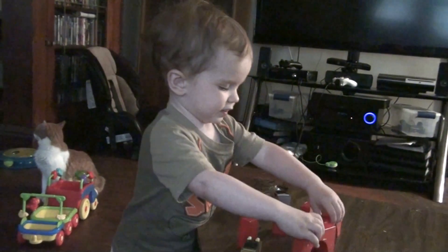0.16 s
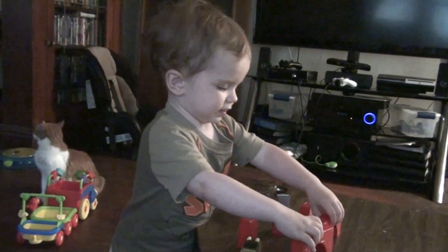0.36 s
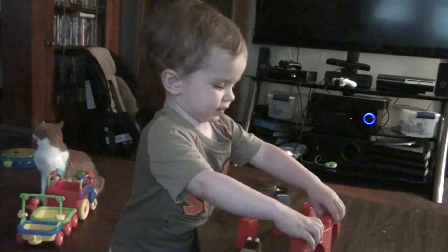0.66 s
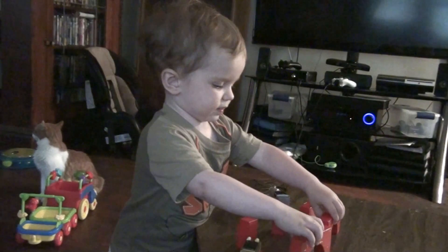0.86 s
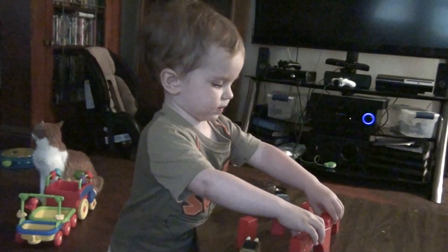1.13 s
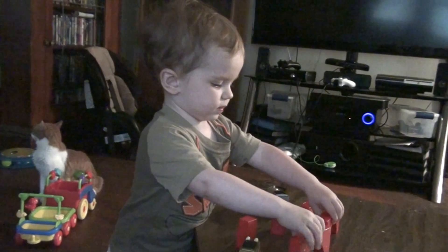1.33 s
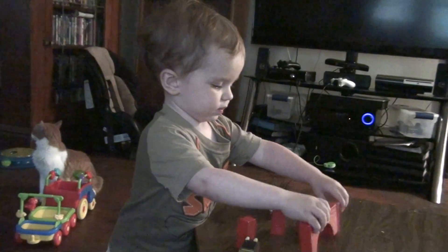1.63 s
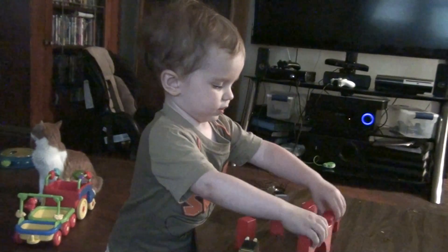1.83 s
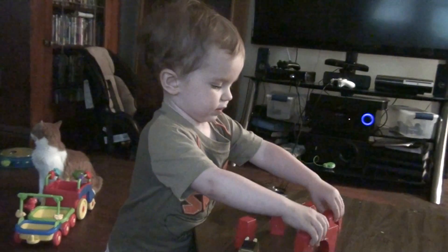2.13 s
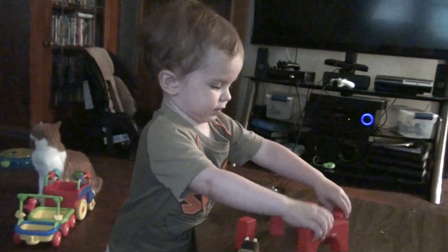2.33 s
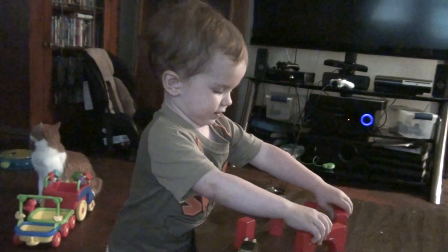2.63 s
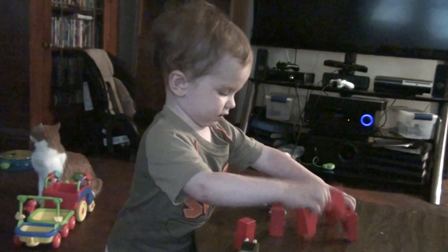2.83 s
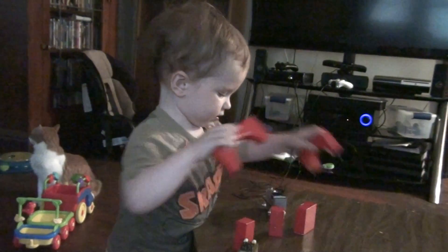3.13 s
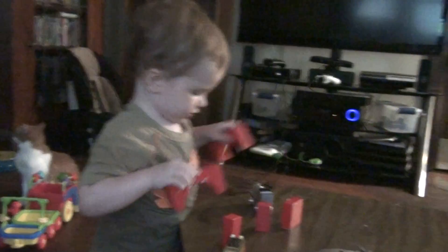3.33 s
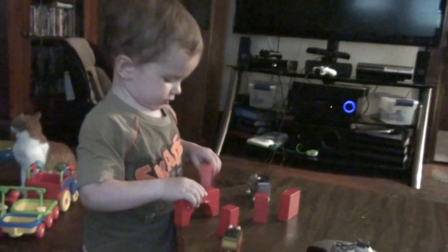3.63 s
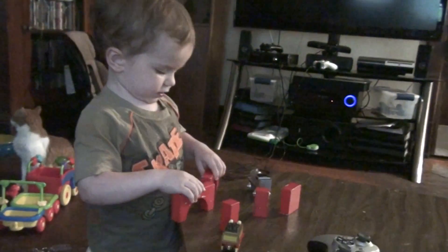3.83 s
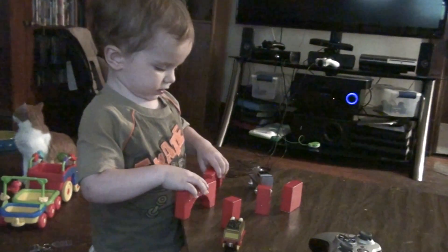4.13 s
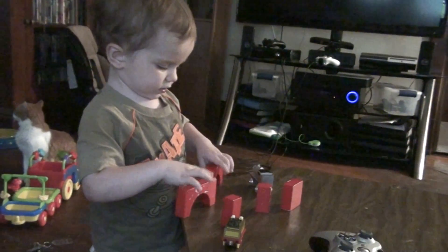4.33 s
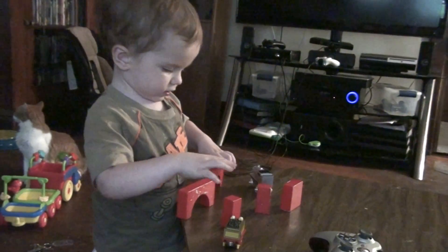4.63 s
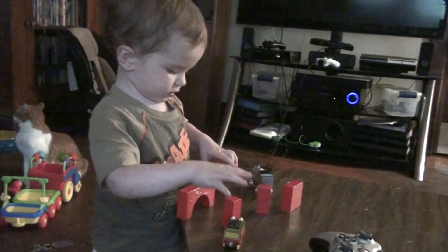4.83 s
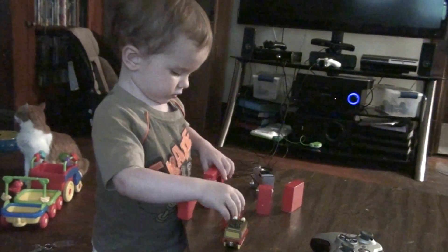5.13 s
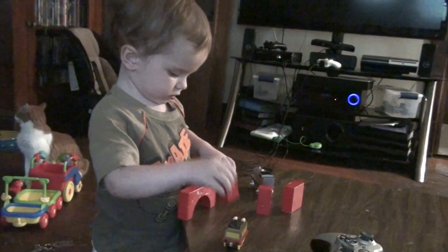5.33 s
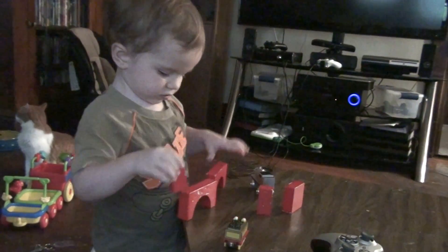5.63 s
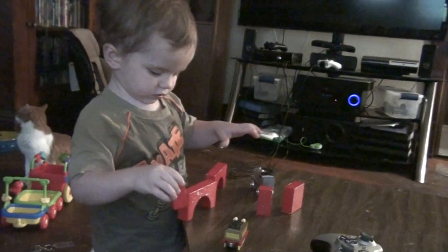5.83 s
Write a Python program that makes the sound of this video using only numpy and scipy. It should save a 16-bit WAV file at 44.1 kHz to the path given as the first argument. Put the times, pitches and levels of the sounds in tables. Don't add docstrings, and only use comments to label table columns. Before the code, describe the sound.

Wooden blocks are bumped, pushed together and set down on a tabletop indoors. Bright, dry clacks with occasional clear pings and woody thumps come in separate clusters: at the start, near two seconds, and after three and a half. The rest is nearly still, with tiny taps over fading rumble, distant street wash and microphone hiss. Stereo, close, slightly right of centre.

```python
import sys
import numpy as np
from scipy import signal
from scipy.io import wavfile
from scipy.ndimage import uniform_filter1d, map_coordinates

SR = 44100
rng = np.random.default_rng(int(sys.argv[2]) if len(sys.argv) > 2 else 0)


def invert_db(level):
    return 10 ** (np.asarray(level, dtype=float) / 20)


def store_pcm(level_fs):
    pcm = np.round(np.clip(level_fs, -1, 1) * 32767).astype(np.int16)
    wavfile.write(sys.argv[1], SR, np.atleast_2d(pcm).T)


N = 263277


def unit(x):
    return x / np.sqrt(np.mean(x ** 2) + 1e-20)


def along(points, hz):
    point_hz, value = np.transpose(points)
    return np.interp(np.log(hz + 1), np.log(point_hz + 1), value)


def wobble(rate_hz):
    knots = rng.standard_normal(int(N * rate_hz / SR) + 4)
    return map_coordinates(knots, [np.arange(N) * rate_hz / SR])


def stereo(z, hz, alike, lean):
    turn = np.arccos(np.clip(along(alike, hz), -1, 1))[:, None] / 2
    mid, side = z[0] * np.cos(turn), z[1] * np.sin(turn)
    lean_db = np.multiply.outer([.5, -.5], along(lean, hz))
    return np.array([mid + side, mid - side]) * invert_db(lean_db)[:, :, None]


# f/Hz, left-right likeness
FLOOR_ALIKE = [(60, 1), (150, 0.96), (380, 0.24), (950, -0.1), (2380, 0.11), (5980, 0.52), (15000, 1)]
# f/Hz, left minus right/dB
FLOOR_SIDE = [(60, -1.0), (240, -1.5), (950, 0), (3770, -0.5), (15000, 0.5)]


def rush(spectrum, patchy_db):
    hz, _, z = signal.stft(rng.standard_normal((2, N + 4096)), SR, nperseg=4096)
    patches = unit(uniform_filter1d(rng.standard_normal(z.shape[1:]), size=24, axis=0))
    gain_db = along(spectrum, hz)[:, None] + patchy_db * patches
    z = stereo(z, hz, FLOOR_ALIKE, FLOOR_SIDE) * invert_db(gain_db)
    return unit(signal.istft(z, SR, nperseg=4096)[1][:, :N])


# t/s, level over calm/dB
BACKGROUND = [
    (0, 8.5),
    (.6, 10),
    (.85, 5.5),
    (1.3, 3),
    (1.75, 3.5),
    (2.7, 6.5),
    (2.82, 7),
    (2.95, 2),
    (4.1, 1.5),
    (5.97, -0.94),
]
# f/Hz, level per Hz/dB
RUMBLE = [(21, -51.5), (35, -6.5), (48, -15.5), (81, -1.5), (129, -10), (144, -21), (177, -11),
          (208, -21.5), (235, -9), (269, -17), (301, -21), (400, -18.5), (520, -49), (880, -120)]
# f/Hz, level per Hz/dB
STREET = [(200, -39), (280, -10.5), (450, -7), (950, -6.5), (1500, -12.5), (3000, -17.5), (5000, -25.5),
          (9000, -66)]
# f/Hz, level per Hz/dB
HISS = [(1470, -37), (2500, -9), (2660, -7), (4240, -4.5), (4760, -5), (5150, -3.5), (15200, -7.5),
        (16000, -6.5)]


def house():
    t = np.arange(N) / SR
    swell_db = np.interp(t, *np.transpose(BACKGROUND))
    fade_db_per_s = 0.07
    rumble_db = -53 + 0.66 * swell_db - fade_db_per_s * (t - t.mean()) + 0.65 * wobble(8.2)
    street_db = -59 + swell_db + 0.25 * wobble(9.1)
    hiss_db = -62.5 + 0.7 * swell_db
    rumble = invert_db(rumble_db) * rush(RUMBLE, patchy_db=1.15)
    street = invert_db(street_db) * rush(STREET, patchy_db=2.5)
    hiss = invert_db(hiss_db) * rush(HISS, patchy_db=1.4)
    return rumble + street + hiss


# f/Hz, t60/s
ROOM_T60 = [(150, 0.48), (500, 0.46), (1500, 0.41), (4000, 0.45), (9000, 0.41), (15000, 0.22)]
# f/Hz, level/dB
ROOM_TONE = [(150, -1), (600, 2.5), (2000, 2.5), (5000, 2.5), (10000, -2.5), (15000, -5.5)]
# f/Hz, left-right likeness
ROOM_ALIKE = [(60, 0.85), (180, 0.94), (550, 0.8), (1650, 0.94), (4970, 0.45), (15000, 1)]
# f/Hz, left minus right/dB
ROOM_SIDE = [(60, -1), (240, -1), (950, -1), (3770, 0), (15000, 0.5)]
# t/s, level/dB
WALLS = [(.007, -14.5), (0.012, -8.5), (0.018, -12.5), (0.021, -9), (0.03, -16.5)]


def room():
    hz, t = np.fft.rfftfreq(256, 1 / SR), np.arange(180) * 128 / SR
    z = rng.standard_normal((2, len(hz), len(t), 2)) @ [1, 1j]
    fall_db = along(ROOM_TONE, hz)[:, None] - 60 * t / along(ROOM_T60, hz)[:, None]
    z = stereo(z, hz, ROOM_ALIKE, ROOM_SIDE) * invert_db(fall_db)
    tail = signal.istft(z, SR, nperseg=256)[1]
    lag_s = np.arange(tail.shape[1]) / SR
    tail *= np.clip((lag_s - .005) / 0.01126, 0, 1) * invert_db(-5.0) / np.linalg.norm(tail[0])
    for s, db in WALLS:
        gain = invert_db(db + rng.normal([-1, 1], 1.56))
        echo = np.outer(gain, np.hanning(7) / 3) * rng.choice([-1, 1])
        tail[:, round(s * SR):][:, :7] += echo
    return tail


def add(out, s, sound, sent, tails):
    near_from_s, near_room_db = 3.2, -2
    tail = tails[rng.integers(len(tails))]
    start, answer = round(s * SR), signal.fftconvolve(sent[None], tail, axes=1)
    out[:, start:start + len(sound)] += sound * invert_db([[-1.1], [1.1]])
    out[:, start:start + answer.shape[1]] += answer * invert_db(near_room_db * (s > near_from_s))


def gripped(t):
    grip_s = .0052
    return (1 - np.exp(-t / 0.00021)) / (1 + (t / grip_s) ** 4)


# t/s, level/dB
LOOSE = [
    (0, -43.5),
    (.0688, -18),
    (.069, -26),
    (.085, -28.5),
    (1.8354, -30),
    (2.098, -24.5),
    (2.19, -33.5),
    (2.39, -45.5),
    (3.772, -45),
]
# t/s, level/dB
FRAME = [
    (.0096, -23),
    (1.7881, -33),
    (2.0851, -32),
    (2.441, -28),
]
# t/s, level/dB
GRAIN = [
    (0.2729, -49.5),
    (2.087, -35.5),
    (2.4409, -43),
]


def lingering(out, tails):
    t = np.arange(SR // 2) / SR
    loose_hz, beat_hz = 3373, 42
    notes = [(s, db, loose_hz - beat_hz * (k % 2), 0.21) for k, (s, db) in enumerate(LOOSE)]
    notes += [(s, db, 145.5, 0.3) for s, db in FRAME]
    notes += [(s, db, 8640, 0.29) for s, db in GRAIN]
    notes += [(s, db - 2.5, 85.7, 0.2) for s, db in FRAME]
    for s, db, hz, t60_s in notes:
        rocking_rad = .009 * max(1, (hz / loose_hz) ** 1.5)
        drift = rocking_rad * np.cumsum(rng.standard_normal(len(t)))
        tone = np.sin(2 * np.pi * hz * t + drift)
        note = invert_db(db - 60 * t / t60_s) * tone * (1 - np.exp(-t * hz / 1.34))
        add(out, s, note, invert_db(-5.5) * note, tails)


# t/s, level/dB, f/Hz
PINGS = [(.0096, -22, 8970), (.2722, -32, 6950), (.2724, -25, 8650), (.2726, -27, 5010), (.2727, -19, 2950),
         (.2728, -23, 2140), (1.7898, -31, 9000), (1.8038, -28, 7190), (1.8168, -27, 7140),
         (1.8352, -29, 9150), (2.0826, -16, 8760), (2.1032, -27, 8650), (2.4269, -24.5, 8990),
         (2.4332, -18, 11140), (2.4347, -16.5, 2990), (2.4352, -23, 8870), (3.5807, -30.5, 2810),
         (3.5925, -26, 4370), (3.5934, -13.5, 2260), (3.7712, -18, 2120)]


def pings(out, tails):
    t = np.arange(1000) / SR
    for s, db, hz in PINGS:
        note = invert_db(db - 60 * t / 0.02) * np.sin(2 * np.pi * hz * t) * gripped(t)
        add(out, s, note, invert_db(-10.5) * note, tails)


def ring(modes, t, scatter_db, scale=1):
    hz, db, t60_s = np.transpose(modes)[:, :, None]
    chance = rng.standard_normal((2, len(modes), 1))
    hz = hz * scale * (1 + 0.038 * chance[0])
    level_db = db + scatter_db * chance[1] - 60 * t / t60_s
    sound = np.sum(invert_db(level_db) * np.sin(2 * np.pi * hz * t), axis=0)
    return sound / np.std(sound[:SR // 200])


def burst(t, low_hz, high_hz, t60_s):
    band = signal.butter(2, [low_hz, high_hz], "band", fs=SR, output="sos")
    sound = signal.sosfilt(band, rng.standard_normal(len(t)) * invert_db(-60 * t / t60_s))
    return sound / np.std(sound[:SR // 200])


LONG_HZ, SHORT_HZ, BRIGHT_HZ = 1680, 1315, 2085
# start t/s, end t/s, first contact level/dB, loss/dB per s, crack level/dB
CHATTER = [
    (0.0699, 0.082, -19, 400, -11),
    (1.8229, 1.834, -16.5, -300, -16),
    (1.843, 1.858, -24.5, 101.5, -18),
    (2.0827, 2.09, -15.5, 52, 0),
    (2.0861, 2.137, -15, 102, -12),
    (2.4272, 2.443, -13, 201, -8.5),
    (2.456, 2.483, -14, 115, -11.5),
]


def chatter():
    gap_s, jitter, swing_db, scatter_db = .0068, .12, 2, 3
    rows = []
    for start, end, db, loss_db_per_s, crack_db in CHATTER:
        chance = rng.standard_normal((12, 5))
        for k, c in enumerate(chance):
            s = gap_s * (k + jitter * c[0] * (k > 0))
            if s <= end - start:
                pitch_hz = BRIGHT_HZ if k % 3 == 2 else LONG_HZ
                level_db = db - loss_db_per_s * s - swing_db * (k % 2)
                table_db, upper_db, snap_db = np.array([-9, -5, crack_db]) + scatter_db * c[1:4]
                rows.append((pitch_hz, start + s, level_db, table_db, upper_db, snap_db))
    return rows


# f/pitch, level/dB, t60/s
BLOCK = [(.55, -6.5, 0.042), (.74, -1.5, 0.019), (1, 1, 0.14), (1.33, 0, 0.031)]
# f/Hz, level/dB, t60/s
UPPER = [(2464, 9, 0.0079), (2960, 2.5, 0.08), (3370, -11.5, 0.021)]
# f/Hz, level/dB, t60/s
TABLETOP = [(252, -16, 0.021), (322.5, -2.5, 0.078), (364, -4.5, 0.072), (456.7, -4.5, 0.061),
            (572, -0.5, 0.036), (583, -10, 0.047), (828, -7, 0.046)]
# t/s, block level/dB, then relative to it tabletop, upper modes, crack level/dB
ARCH = [(0.0657, -18, -9.5, 3, -13), (.086, -24.5, -0.5, 6, -17.5), (0.091, -18.5, -31, -21, -24),
        (.102, -20.5, -30, -1, -16), (0.2726, -16.5, -9, -8, -9.5), (1.7787, -16.5, -28.5, -8.5, -25),
        (1.7896, -12, -5, -16, -13.5), (1.8033, -14.5, -4.5, -12, -8), (1.8157, -13, -14, -6.5, -10),
        (1.837, -17.5, -11.5, -16.5, -6.5), (2.0405, -33, -10.5, -23.5, -17),
        (2.053, -13.5, -8, -23.5, -5.5), (2.0724, -21.5, -10.5, -11.5, -15.5),
        (2.434, -12, -21, -11, -11.5), (2.4478, -13.5, -11.5, 1.5, -1.5), (3.5923, -14, -32, -34, -3.5),
        (3.611, -34.5, 2, -27.5, -18), (3.6736, -23, 7, -5.5, -3.5), (3.7029, -25.5, 5.5, -6.5, -13)]
POST = [(.0092, -18, 0.5, -21, -9), (.041, -34.5, 6, -20, -20), (.284, -28.5, -5, -25, -24),
        (1.49, -53.5, 7, -4, -14), (2.391, -25.5, -2, -35, -18), (2.4093, -32.5, 2.5, -7, -27),
        (3.581, -20.5, 5, -7.5, -0.5), (3.587, -24, 10.5, -19, -9.5), (3.7723, -20.5, -1, -11.5, -14),
        (3.782, -27.5, -32, -20, -9), (3.96, -61, 21.5, -16, -14), (4.372, -64.5, 27, -7, -9),
        (4.519, -57.5, 22.5, -2, -9), (5.142, -51.5, 3, -13, -1), (5.187, -41, -12, -26, -30),
        (5.203, -54, 7, -15.5, -10.5)]


def knocks(out, tails):
    t = np.arange(SR // 9) / SR
    grip = gripped(t)
    snap = invert_db(4.5) * grip * np.exp(-t / .002)
    contacts = [(LONG_HZ, *row) for row in ARCH] + [(SHORT_HZ, *row) for row in POST] + chatter()
    for pitch_hz, s, db, table_db, upper_db, crack_db in contacts:
        wood = ring(BLOCK, t, 2.24, scale=pitch_hz)
        wood += invert_db(-3.5) * burst(t, 950, 1800, t60_s=0.086)
        upper = ring(UPPER, t, 1.5) + invert_db(-5) * burst(t, 2300, 4000, t60_s=.025)
        wood += invert_db(upper_db - 3) * upper
        crack = invert_db(crack_db - 9) * burst(t, 5000, 11000, t60_s=0.0083)
        thump = invert_db(table_db) * ring(TABLETOP, t, 2.4) * (1 - np.exp(-t / 0.0023))
        direct = invert_db(db) * ((wood + crack) * grip + thump)
        sent = invert_db(db - 0.5) * ((wood + crack) * snap + invert_db(-2) * thump)
        add(out, s, direct, sent, tails)


def blocks():
    out = np.zeros((2, N + 2 * SR))
    tails = [room() for _ in range(24)]
    lingering(out, tails)
    pings(out, tails)
    knocks(out, tails)
    return out[:, :N]


def scene():
    return house() + blocks()


def band_limit(x):
    return signal.sosfilt(signal.butter(12, 16480, fs=SR, output="sos"), x)


def record(dry):
    top, knee = .66, 5.5
    squeezed = dry / (1 + np.abs(dry / top) ** knee) ** (1 / knee)
    band = signal.butter(3, [34, 15000], "band", fs=SR, output="sos")
    mix = signal.sosfilt(band, squeezed)
    return band_limit(mix)


dry = scene()
out = record(dry)
store_pcm(out)
```